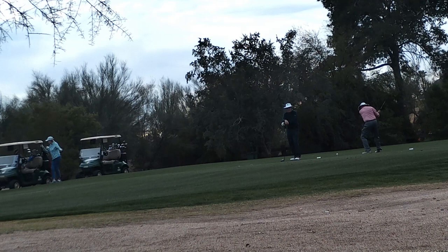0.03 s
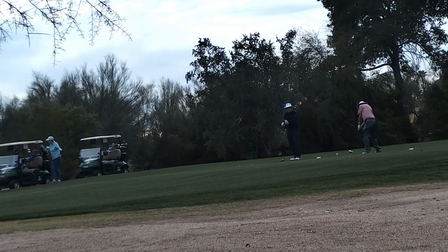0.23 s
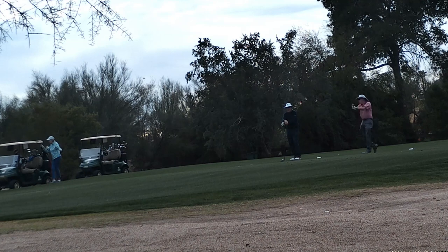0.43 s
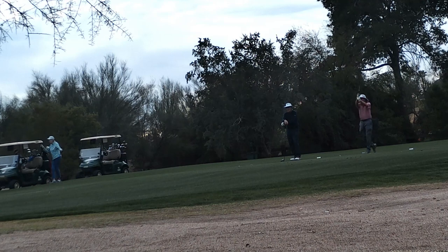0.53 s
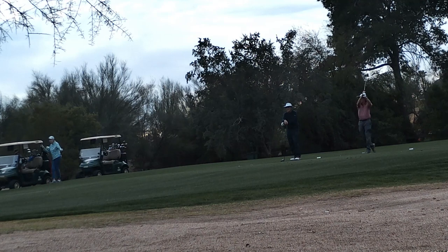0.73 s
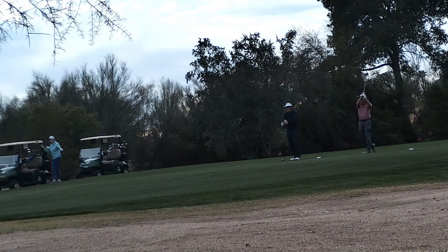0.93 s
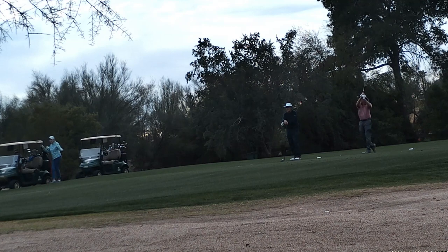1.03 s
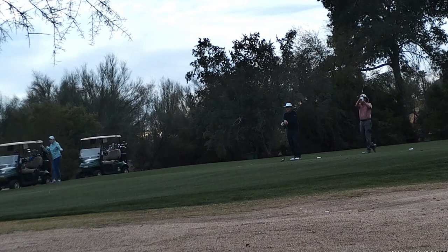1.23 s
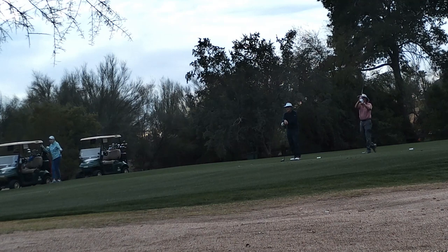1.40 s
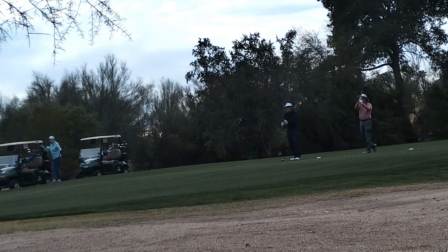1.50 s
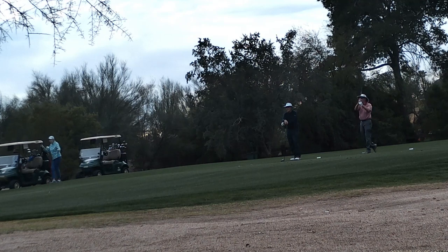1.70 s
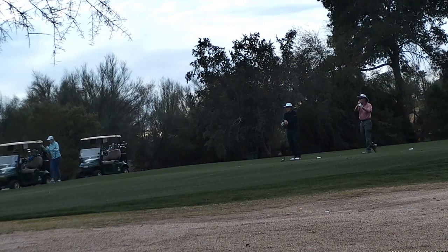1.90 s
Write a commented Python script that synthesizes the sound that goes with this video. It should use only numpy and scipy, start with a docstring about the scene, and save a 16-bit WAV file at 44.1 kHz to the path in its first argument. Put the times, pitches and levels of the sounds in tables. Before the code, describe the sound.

A close, loud air horn blasts once, starting with a hissing squeal and dropping to a steady brassy note. A golf club knocks a ball during the blast. Quiet outdoor air follows, with very faint bird chips.

```python
"""Outdoor air and a distant engine hum on a golf course. At 0.21 s a close, hand-held gas air horn sounds:
gas hisses, the diaphragm starts high with a second, squealing mode, then drops onto a steady brassy note.
A club knocks a ball during the half-second blast. The valve shuts and the trees echo faintly.
A small bird chips, with two small ticks nearby between its calls."""
import sys
import numpy as np
from scipy import signal
from scipy.fft import rfft, irfft
from scipy.io import wavfile
from scipy.ndimage import uniform_filter1d, minimum_filter1d

SR = 44100
rng = np.random.default_rng(int(sys.argv[2]) if len(sys.argv) > 2 else 0)


def generate_wav(signal):
    """Clip the signal to [-1, 1] and save it as 16-bit WAV at the path in sys.argv[1]."""
    frames = np.transpose(np.atleast_2d(signal))
    scaled = np.clip(frames, -1, 1) * 32767
    pcm = np.round(scaled).astype(np.int16)
    wavfile.write(sys.argv[1], SR, pcm)


N = 85995
T = np.arange(N) / SR

# Outdoor air. Each row: frequency in Hz, relative density in dB.
AIR_SPECTRUM = [(15, -41), (25, -6), (43, -9), (75, -7.5), (101, -12.5), (193, -17.5), (289, -23.5),
                (368, -28), (537, -32), (614, -28), (970, -37.5), (1660, -39.5), (2770, -45),
                (11500, -53.5), (15500, -51)]
# Escaping gas. Each row: frequency in Hz, relative density in dB.
GAS_SPECTRUM = [(100, -14.5), (500, -14.5), (1100, -19), (1650, -13), (1900, 1), (2250, -3), (2750, -13),
                (3500, -4), (4300, -14), (4850, -6), (5300, -16), (5900, -11), (7000, -23.5), (9000, -25),
                (10200, -16), (13000, -31), (15500, -35)]
# Gas hiss. Each row: time in seconds, level in dB.
GAS_ENVELOPE = [(.207, -80.5), (.214, -53), (.228, -48.5), (.242, -39), (.28, -35), (.295, -33),
                (.32, -37.5), (.44, -41), (.69, -41), (.715, -52), (.77, -73)]
# Diaphragm pitch. Each row: time in seconds, frequency in Hz.
DIAPHRAGM_PITCH = [(.212, 2020), (.22, 1824), (.24, 1413), (.25, 1196), (.265, 1077), (.28, 1009),
                   (.3, 964.5), (.32, 939.7), (.35, 920), (.4, 911), (.52, 905.2), (.71, 905.5),
                   (.75, 894.7)]
# Horn note. Each row: time in seconds, fundamental in dB, octave in dB, overtone gain in dB.
NOTE_ENVELOPE = [(.21, -53.5, -88.5, -63), (.215, -30, -63, -48.5), (.238, -17.5, -49.5, -37),
                 (.253, -26.5, -30.5, -26.5), (.265, -24, -27, -26.5), (.279, -16.5, -8.5, -20),
                 (.29, -16, -6, -1), (.35, -11, -4, 6.5), (.46, -8, -3.5, 5.5), (.63, -10, -4.5, 6.5),
                 (.699, -9.5, -5.5, 4.5), (.712, -14, -12.5, -2), (.738, -27.5, -32, -11),
                 (.752, -36.5, -60.5, -35.5), (.785, -60.5, -86, -43.5)]
# Overtones. Each row: harmonic number, base level in dB, change at full sag in dB, change once shut in dB.
NOTE_OVERTONES = [(3, -34, -21.5, 10), (4, -33, -3.5, -4.5), (5, -36, -10.5, -0.5), (6, -38, -9, -14),
                  (7, -41.5, -3.5, -0.5), (8, -46, -1.5, -9.5), (9, -50, -4, -4.5), (10, -54.5, 2.5, -5.5),
                  (11, -57, 0.5, -3.5), (12, -59.5, -6, -12), (13, -58.5, -2, -7.5), (14, -60.5, -8, -16.5),
                  (15, -58, -9, -12), (16, -65.5, -10, -11.5), (17, -72, -3.5, -9.5)]
# Mid-blast mellowing. Each row: time in seconds, sag from 0 to 1.
TONE_SAG = [(.39, 0), (.43, 0.95), (.49, 0.9), (.58, 0.2), (.63, 0.18)]
# Second diaphragm mode. Each row: time in seconds, frequency in Hz, level in dB.
SQUEAL_MODE = [(.21, 4100, -68), (.217, 3346, -26), (.221, 2995, -31.5), (.226, 2795, -32.5),
               (.236, 2722, -22.5), (.246, 2525, -7), (.254, 2426, -10), (.264, 2330, -11),
               (.273, 2367, -23), (.286, 2171, -48.5)]
# Mixing tones. Each row: squeal multiple, note multiple, level in dB relative to the squeal at its peak.
MIXING_TONES = [(2, 0, -27), (2, 1, -30.5), (3, 0, -39), (3, 1, -46), (4, 0, -36), (4, 1, -46), (5, 0, -49)]
# Club on ball. Each row: frequency in Hz, relative density in dB.
CLUB_SPECTRUM = [(80, -23.5), (250, -7), (650, -0.5), (1200, -9.5), (3000, -14.5), (9000, -29.5),
                 (15000, -45.5)]
# Bird chips. Each row: centre time in seconds, level in dB.
BIRD_CHIPS = [(.829, -69), (1.021, -68), (1.149, -70), (1.355, -73), (1.564, -67), (1.726, -67.5),
              (1.892, -67)]
# Nearby ticks. Each row: start in seconds, level in dB.
TICK_EVENTS = [(1.381, -61), (1.437, -60)]
# One tick. Each row: frequency in Hz, relative density in dB.
TICK_SPECTRUM = [(400, -31), (1800, 12), (2800, -2), (3700, 8), (7000, -28)]

VALVE_OPEN_S, VALVE_CLOSE_S = .214, .698


def undb(db):
    """Decibels to gain."""
    return 10 ** (np.asarray(db) / 20)


def curve(table, column=1):
    """Table column, linear in time between rows."""
    rows = np.array(table, float)
    return np.interp(T, rows[:, 0], rows[:, column])


def envelope(table, column=1):
    """Gain from a dB column, silent outside the table."""
    return undb(curve(table, column)) * (T > table[0][0]) * (T < table[-1][0])


def running_phase(hz):
    """Frequency integrated to radians."""
    return 2 * np.pi * np.cumsum(hz) / SR


def shaped_noise(gain_at):
    """Unit-rms noise from a gain function of frequency."""
    hz = np.arange(N // 2 + 1) * SR / N + 1e-3
    x = irfft(rfft(rng.standard_normal(N)) * gain_at(hz), N)
    return x / x.std()


def noise(spectrum):
    """Unit-rms noise from a spectrum table."""
    hz, db = np.array(spectrum, float).T
    return shaped_noise(lambda f: undb(np.interp(np.log(f), np.log(hz), db)) * np.minimum(f / hz[0], 1))


def drift(rate_hz):
    """Smooth random motion, unit rms."""
    return shaped_noise(lambda f: np.exp(-(f / rate_hz) ** 2))


def burst(start_s, decay_s, spectrum):
    """Short knock of coloured noise."""
    age = np.maximum(T - start_s, 0) / decay_s
    return 2 * np.sqrt(age) * np.exp(-age) * noise(spectrum)


def air(level_db=-52.5, waver_db=.32):
    """Low, slightly wavering outdoor noise."""
    return undb(level_db + waver_db * drift(9.2)) * noise(AIR_SPECTRUM)


def engine(centre_hz=72, half_width_hz=6.9, level_db=-53):
    """Distant engine: a narrow noise band, heard as a wavering hum."""
    return undb(level_db) * shaped_noise(lambda f: 1 / (1 + ((f - centre_hz) / half_width_hz) ** 2))


def gas_hiss(phase, pulse_depth=.22):
    """Escaping gas, pulsing once per diaphragm cycle."""
    return noise(GAS_SPECTRUM) * envelope(GAS_ENVELOPE) * (1 + pulse_depth * np.sin(phase))


def note(pitch_hz, phase, shut_s=.006, waver_db=1.5, waver_hz=4.8):
    """Main diaphragm mode: fundamental, octave and brassy overtones that dull as the valve shuts."""
    out = envelope(NOTE_ENVELOPE, 1) * np.sin(phase) - envelope(NOTE_ENVELOPE, 2) * np.cos(2 * phase)
    brightness, sag = envelope(NOTE_ENVELOPE, 3), curve(TONE_SAG)
    shut = np.clip((T - VALVE_CLOSE_S) / shut_s, 0, 1)
    for harmonic, base_db, sag_db, shut_db in NOTE_OVERTONES:
        gain = brightness * undb(base_db + sag_db * sag + shut_db * shut + waver_db * drift(waver_hz))
        in_band = harmonic * pitch_hz < SR / 2
        out += gain * in_band * np.sin(harmonic * (phase + np.pi / 2))
    return np.sqrt(2) * out


def squeal(phase, jitter=.002, flutter_db=2.5, rasp_s=.261, rasp_width_s=.016, third_db=-38, sum_db=-29):
    """Second mode: slides down, mixes with the note and rasps just before the note locks."""
    mode_phase = running_phase(curve(SQUEAL_MODE) * (1 + jitter * drift(247)))
    gain = envelope(SQUEAL_MODE, 2)
    mixed = sum(undb(db + flutter_db * drift(90)) * np.sin(m * mode_phase + k * phase)
                for m, k, db in MIXING_TONES)
    tone = gain * (np.sin(mode_phase) + (gain / gain.max()) ** .3 * mixed)
    # The third harmonic beats against the two modes' sum tone.
    beating = undb(third_db) * np.sin(3 * phase) + undb(sum_db) * np.sin(mode_phase + phase)
    swell = np.exp(-((T - rasp_s) / rasp_width_s) ** 2)
    return np.sqrt(2) * (tone + swell * beating)


def valve_whistle(start_hz=12400, end_hz=14190, rise_s=.036, attack_s=.049, release_s=.012, db=-54.5):
    """Thin rising whistle from the open valve."""
    age_s = np.maximum(T - VALVE_OPEN_S, 0)
    hz = end_hz + (start_hz - end_hz) * np.exp(-age_s / rise_s) + 8 * drift(120)
    flow = np.minimum(age_s / attack_s, 1) * np.exp(-np.maximum(T - VALVE_CLOSE_S, 0) / release_s)
    return np.sqrt(2) * undb(db) * flow * np.sin(running_phase(hz))


def horn(jitter=.00025):
    """One blast: note, squeal and hiss share the diaphragm's cycle; the valve whistles above."""
    pitch_hz = curve(DIAPHRAGM_PITCH) * (1 + jitter * drift(90))
    phase = running_phase(pitch_hz)
    return note(pitch_hz, phase) + squeal(phase) + gas_hiss(phase) + valve_whistle()


def tree_echo(x, cutoff_hz=1196.7, delay_s=.245, echo_db=-55.5, scatter_db=-46.5, t60_s=.6):
    """Dull echo from the tree line, thin scatter from open ground."""
    dull = signal.sosfilt(signal.butter(2, cutoff_hz, fs=SR, output="sos"), x)
    echo = np.interp(T - delay_s, T, dull, left=0)
    tail = rng.standard_normal(N) * undb(-60 * T / t60_s)
    scatter = signal.fftconvolve(dull, tail / np.linalg.norm(tail))[:N]
    return undb(echo_db) * echo + undb(scatter_db) * scatter


def club(start_s=.365, crack_db=-30.5, crack_decay_s=.0023, ring_hz=596, ring_db=-19.5, ring_s=.0018):
    """Club meets ball some way off: a dull crack and one damped mode."""
    age_s = np.maximum(T - start_s, 0)
    ring = np.exp(-age_s / ring_s) * np.sin(2 * np.pi * ring_hz * age_s)
    return undb(crack_db) * burst(start_s, crack_decay_s, CLUB_SPECTRUM) + undb(ring_db) * ring


def bird(centre_hz=5596, fall_hz_per_s=220000, width_s=.0026):
    """Small bird: very short falling chips."""
    out = np.zeros(N)
    for centre_s, db in BIRD_CHIPS:
        offset_s = T - centre_s
        phase = 2 * np.pi * offset_s * (centre_hz - fall_hz_per_s * offset_s / 2)
        out += undb(db) * np.exp(-(offset_s / width_s) ** 2) * np.sin(phase)
    return out


def ticks(decay_s=.002):
    """Small ticks nearby."""
    return sum(undb(db) * burst(start_s, decay_s, TICK_SPECTRUM) for start_s, db in TICK_EVENTS)


def limiter(x, ceiling=.76, release_s=.07, window_samples=300):
    """Look-ahead peak limiter with smooth release."""
    peak = -minimum_filter1d(-np.abs(x), size=window_samples)
    log_excess = np.log(np.maximum(peak / ceiling, 1))
    growth = np.exp(T / release_s)
    held = np.maximum.accumulate(log_excess * growth, axis=-1) / growth
    return x * np.exp(-uniform_filter1d(held, size=window_samples))


def scene():
    """Horn with echo, club and bird over the quiet course; mono."""
    blast = horn()
    return (blast + tree_echo(blast) + club() + bird() + engine() + ticks() + air())[None]


def record(dry, cutoff_hz=15700):
    """The limiter holds the blast down, ducking the background; a low-pass cuts the top treble."""
    return signal.sosfilt(signal.ellip(10, .1, 80, cutoff_hz, fs=SR, output="sos"), limiter(dry))


dry = scene()
out = record(dry)
generate_wav(out)
```